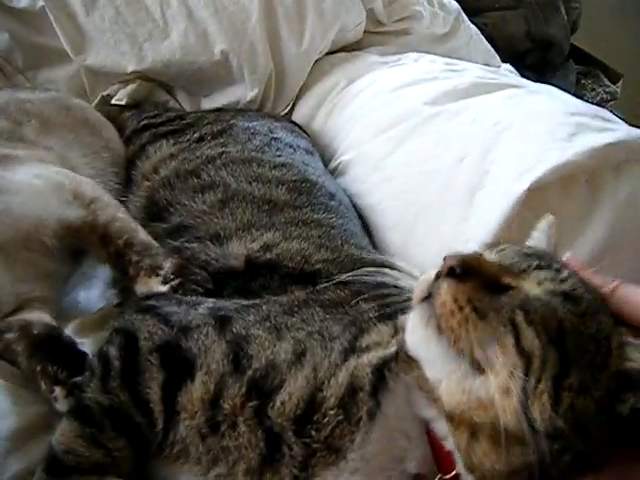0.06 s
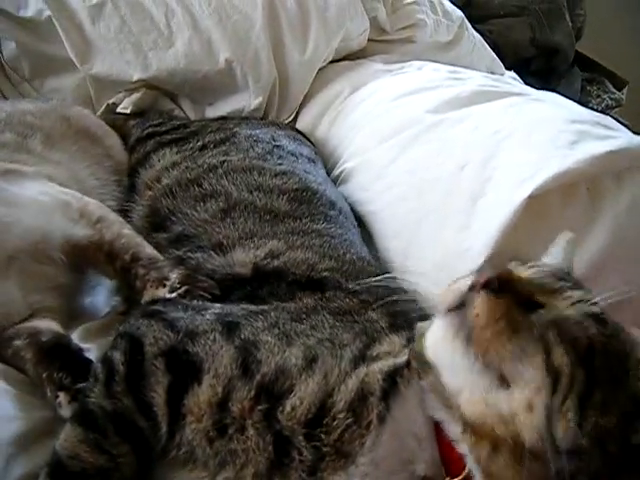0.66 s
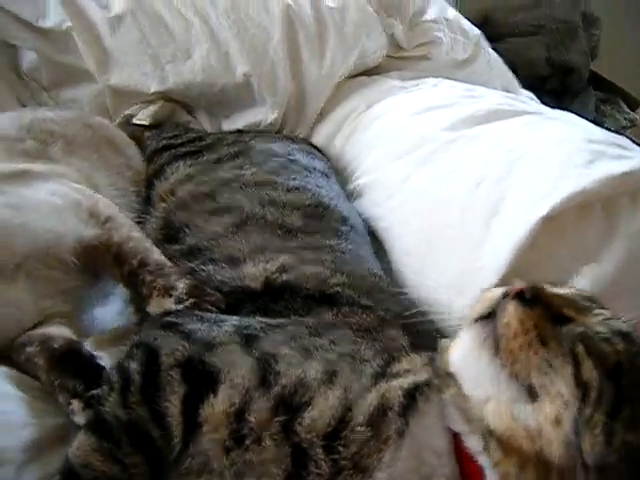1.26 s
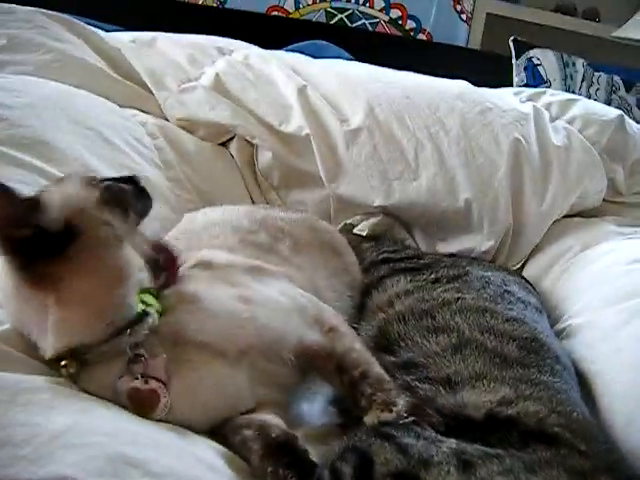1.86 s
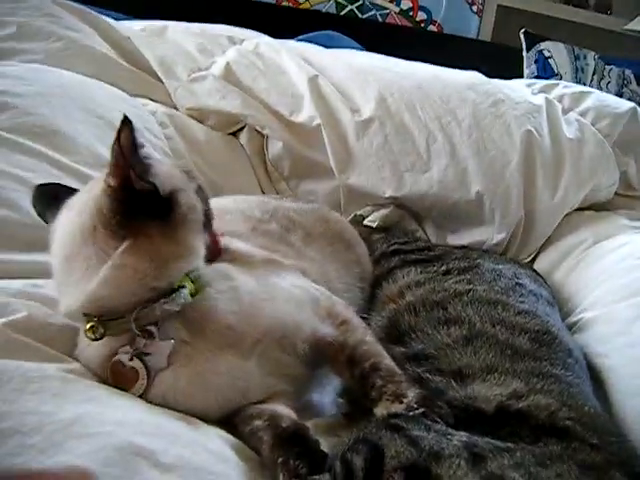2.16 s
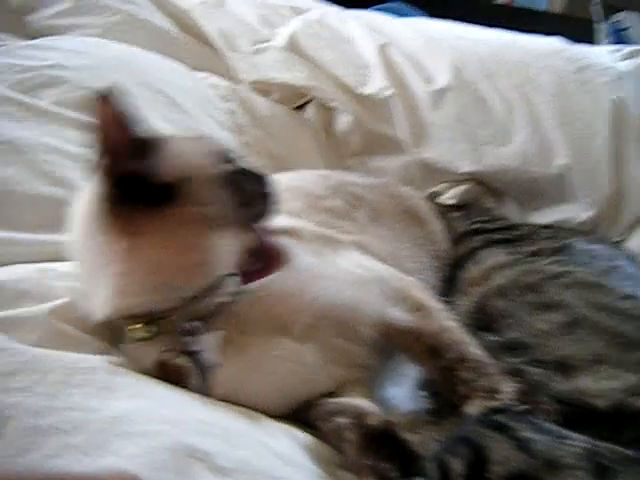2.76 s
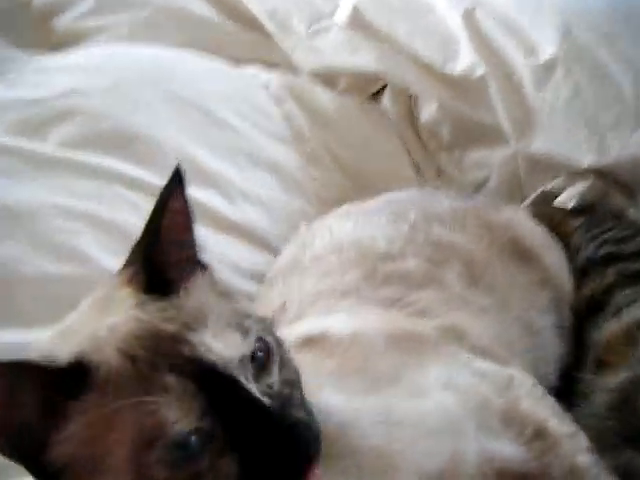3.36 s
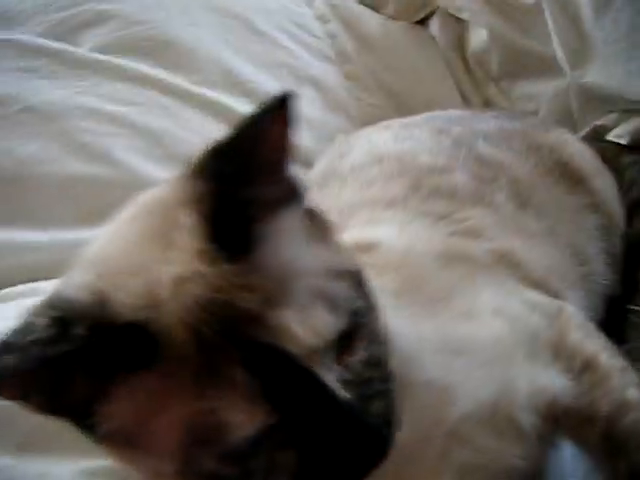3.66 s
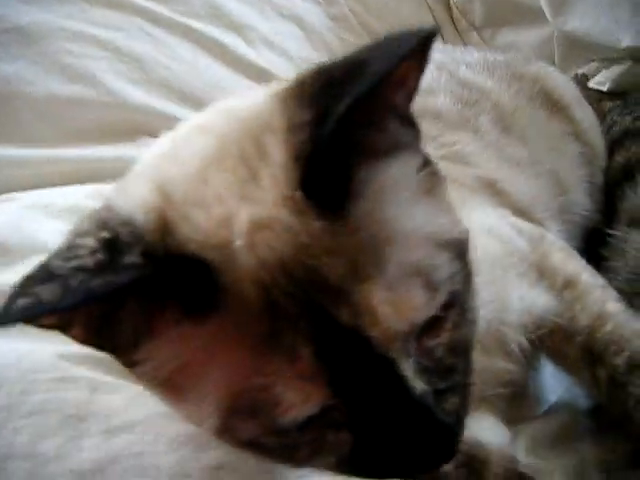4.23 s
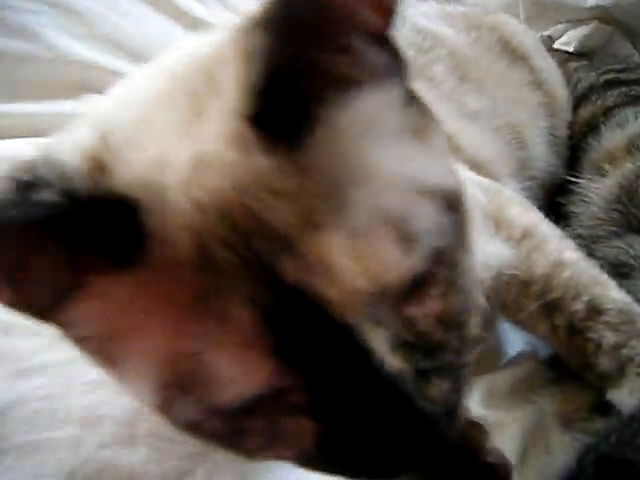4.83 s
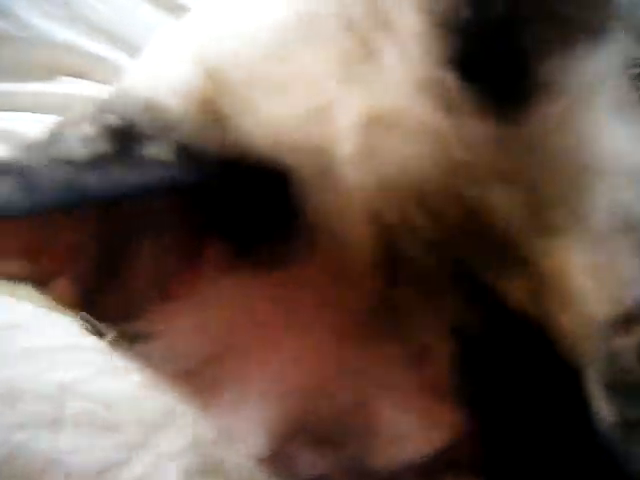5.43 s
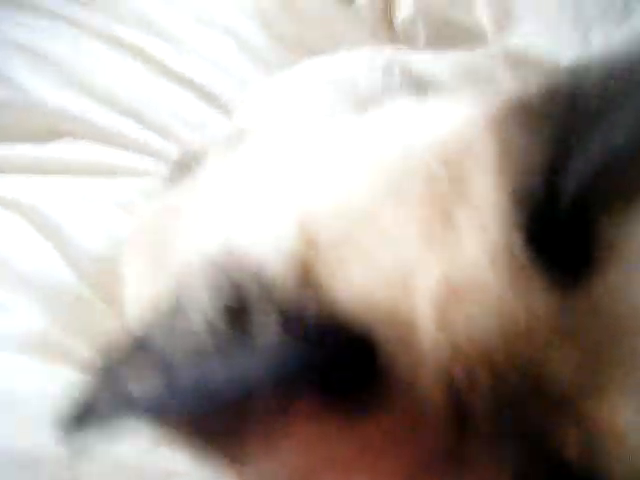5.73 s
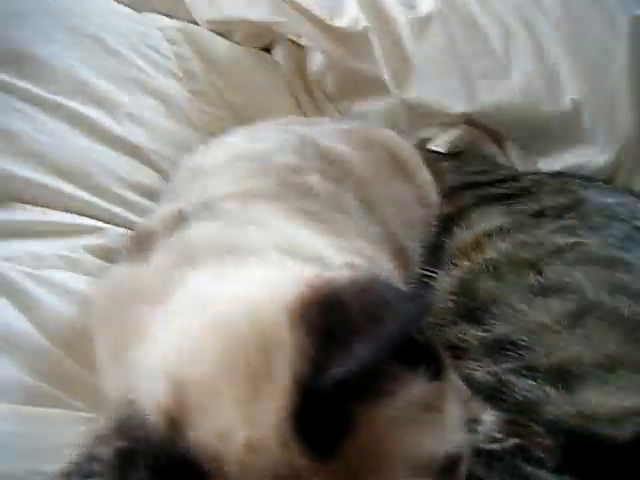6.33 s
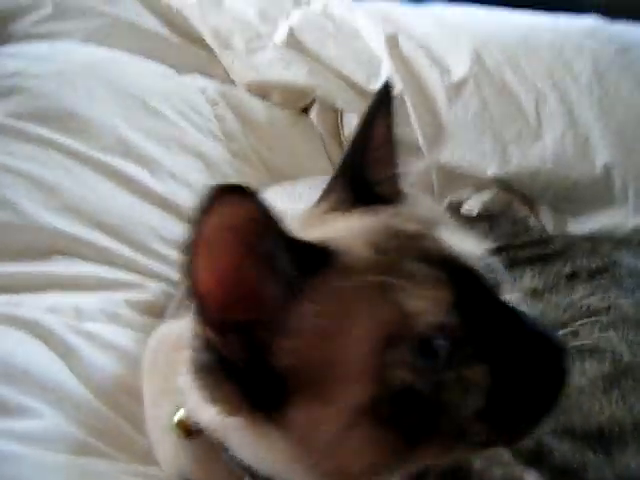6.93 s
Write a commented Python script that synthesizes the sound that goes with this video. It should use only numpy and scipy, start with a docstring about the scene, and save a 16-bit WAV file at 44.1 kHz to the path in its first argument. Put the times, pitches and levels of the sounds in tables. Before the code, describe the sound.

A kitten moves on softly rustling sheets, its collar tags and tiny bell chinking, with a few handling knocks and low room rumble.

```python
"""A quiet room: a kitten shifts about on bedding, close to the microphone of a hand-held camera.
Its collar tags tick and slide on each other, and a tiny bell, muffled by fur, chinks in between.
Sheets and fur rustle. There are light clicks and taps, camera bumps and a finger grazing the microphone.
Behind it all lie low room rumble, hiss and a faint whine; the sound is mono, on two channels."""
import sys
import numpy as np
from scipy import signal
from scipy.fft import rfft, irfft, next_fast_len
from scipy.io import wavfile
from scipy.ndimage import uniform_filter1d

SR = 44100
rng = np.random.default_rng(int(sys.argv[2]) if len(sys.argv) > 2 else 0)


def bounce(signal):
    """Save signal as a 16-bit WAV file at the path given by the first command-line argument."""
    frames = np.transpose(np.atleast_2d(signal))
    limited = np.clip(frames, -1, 1)
    pcm = np.round(limited * 32767).astype(np.int16)
    wavfile.write(sys.argv[1], SR, pcm)


N = 308259
T = np.arange(N) / SR
AGE = T[:SR // 5]  # time since a blow, s

# spectrum of tag scraping on tag: f/Hz, level/dB
SCRAPE_SPECTRUM = [(2000, -18), (3800, -9.5), (4700, -12.5), (5700, -6.5), (6380, -2), (6900, -6),
                   (7800, -29), (9200, -8), (10500, 0.5), (11100, -11), (11800, 0.5), (13000, 0),
                   (15800, -5)]
# bright spectrum of brushed fur and of the bell pellet's tick: f/Hz, level/dB
BRUSH_SPECTRUM = [(3000, -18), (5000, -9), (6400, 1.5), (7800, -11), (9500, -0.5), (12000, 2.5),
                  (15800, -2.5)]
# midrange spectrum of swishing cloth and of the crack in a click: f/Hz, level/dB
SWISH_SPECTRUM = [(1600, -3), (2400, -1.5), (2750, -3), (3300, 1), (4200, -5.5), (6400, -11.5), (7800, -25)]


def tag_ticks(focus_db=12, focus_hz=600, attack_s=0.00048):
    """Each contact chatters for a moment and rings the tags; where it lands picks the strongest mode."""
    # modes of the tags: f/Hz, t60/s, level/dB
    tag_modes = [(3660, 0.0046, -0.5), (5700, 0.01, 1), (6300, 0.025, -2), (6920, 0.0091, -15),
                 (8560, 0.08, -14.5), (9600, .01, -19), (10740, .06, -8.5), (11660, 0.032, -6.5),
                 (11970, .05, -5.5), (14300, 0.017, 1), (13700, 0.011, -16), (15530, 0.014, -6)]
    lowpass = signal.butter(8, 7400, fs=SR, output="sos")
    highpass = signal.butter(8, 8300, "high", fs=SR, output="sos")
    attack = 1 - np.exp(-AGE / attack_s)
    damping = fade(0.0093) + undb(-20.5)  # the neighbouring tag soon stops the ring; a little lingers
    out = np.zeros(N)
    for s, db, main_hz, low_db in tag_contacts():
        modes = [(hz, t60, mode_db + focus_db * np.exp(-((hz - main_hz) / focus_hz) ** 2))
                 for hz, t60, mode_db in tag_modes]
        chatter = burst(SCRAPE_SPECTRUM, t60=0.014)
        hit = (peak(ring(modes) * damping, 0) + peak(chatter, -3)) * attack
        add(out, s, peak(signal.sosfilt(highpass, hit), db - 1.5))
        add(out, s, peak(signal.sosfilt(lowpass, hit), db + low_db - 1))
    return out


def tag_contacts(rebound_s=0.007, rebound_db=-12.5, touch_hz=12100, touch_low_db=-17):
    """The tags bounce once after each blow, and touch lightly at random as the collar sways."""
    # tag strikes tag: t/s, treble level/dB, favoured f/Hz, low modes re treble/dB
    blows = [(1.4723, -23, 13900, -17), (1.4793, -20.5, 12000, -14.5), (1.495, -20, 11800, -27),
             (1.5303, -25, 11900, -22), (1.5344, -15, 11900, -19), (2.106, -28.5, 10300, -9),
             (2.1134, -26, 10400, -9), (2.4591, -25, 10500, -4.5), (2.596, -20.5, 11900, -10.5),
             (2.617, -25, 15000, -10.5), (2.708, -35, 13300, -11), (2.752, -27, 11900, -9),
             (2.765, -20.5, 12800, -3), (2.81, -25, 10500, -2.5), (2.891, -25.5, 8700, -5),
             (2.919, -37, 8620, -6), (3.2321, -38, 10900, -16), (3.3203, -19.5, 12900, -9.5),
             (3.3343, -22, 11600, -25), (3.519, -22.5, 10700, -22), (3.5666, -26, 13800, -11),
             (3.5767, -32, 13700, -13), (3.641, -31, 10700, -19), (3.6515, -31, 11000, -18),
             (4.104, -32, 10400, -10), (4.2222, -43, 12700, 0), (4.958, -37, 12000, -16),
             (5.1567, -38, 12000, -10), (5.1886, -41, 11900, -6)]
    # the collar sways: start/s, end/s, rate/(ticks per s)
    sways = [(1.48, 1.53, 70), (2.567, 2.83, 18), (3.102, 3.3, 14), (3.621, 3.645, 80), (6.672, 6.88, 8.8)]
    contacts = list(blows)
    for s, db, hz, low_db in blows:
        delay = rebound_s * np.exp(.2 * rng.standard_normal())
        contacts.append((s + delay, db + rebound_db, hz, low_db))
    for start, end, rate in sways:
        sway_db = -47 + 4 * np.log2(rate / 10)  # busier is louder
        for slot in np.arange(start, end - .5 / rate, 1 / rate):
            s = slot + rng.random() / rate
            contacts.append((s, rng.normal(sway_db, 1.5), rng.normal(touch_hz, 600), touch_low_db))
    return contacts


def tag_slides(sing_db=-6, squeal_db=21, big_tag_below_hz=10000):
    """Metal edges scrape along each other, swelling and letting go, and one mode sings out."""
    # tag slides on tag: start/s, length/s, level/dB, singing f/Hz
    slides = [(0.239, .052, -48, 11770), (1.027, .033, -54, 11200), (1.455, 0.095, -35.5, 11900),
              (1.538, 0.055, -45, 10480), (1.667, 0.06, -49, 11770), (1.9, 0.12, -45.5, 10480),
              (2.03, 0.072, -41, 10480), (2.103, 0.025, -35, 10480), (2.129, 0.054, -43.5, 10480),
              (2.303, 0.13, -49, 11770), (2.585, .036, -41, 11770), (2.752, 0.047, -44, 12950),
              (2.873, .03, -53, 14850), (3.32, 0.07, -50.5, 14850), (4.094, 0.0077, -47, 12950),
              (6.891, 0.067, -44, 13950)]
    scrape = friction(SCRAPE_SPECTRUM, grain_db=3, grain_hz=1000)
    rasp = undb(-15) * band(3840, 450)
    squeal_swell = swell(1.56, 0.056, 0.056)  # one scrape briefly squeals louder
    sing = undb(sing_db + squeal_db * squeal_swell)
    out = np.zeros(N)
    for s, length, db, hz in slides:
        progress = np.clip((T - s) / length, 0, 1)
        pressure = np.sin(np.pi * progress).clip(0) ** 0.42
        metal = scrape + sing * band(hz, 380) + rasp * (hz < big_tag_below_hz)
        out += undb(db + .5) * pressure * metal
    return out / np.hypot(1, sing)  # singing changes the tone, not the overall level


def bell(attack_s=0.001, detune=0.0045, tick_db=-22, roll_db=-21):
    """The pellet ticks on the shell and rolls on a little; fur stops most of the ring at once."""
    # lower and upper modes of the shell: f/Hz, t60/s, level/dB
    low_modes = [(5530, 0.017, -4), (5450, 0.14, -24), (5790, 0.024, -12)]
    high_modes = [(12700, 0.058, -2), (13220, .04, 0)]
    attack = 1 - np.exp(-(AGE / attack_s) ** 2)
    rolling = band(5550, 500)
    out = np.zeros(N)
    for s, db, upper_db in pellet_strikes():
        load = rng.normal(1, detune)  # pellet and fur load the shell differently each time
        low = ring([(hz * load, t60, mode_db) for hz, t60, mode_db in low_modes])
        shell = peak(low * attack, -1.3) + peak(ring(high_modes) * attack, upper_db - 2)
        tick = peak(burst(BRUSH_SPECTRUM, t60=.008), tick_db)
        roll = undb(roll_db) * rolling[int(s * SR):][:len(AGE)] * attack * fade(0.09)
        add(out, s, undb(db) * (shell + tick + roll))
    return out


def pellet_strikes(settle_s=3.6, count=10, gap_s=0.061, jitter_s=0.0077, upper_db=-15):
    """The pellet's clear strikes, and an uneven run of fading ones as it rocks to rest."""
    # pellet strikes shell: t/s, level/dB, upper modes relative/dB
    strikes = [(1.0021, -36, -12), (1.1636, -28.5, -12), (1.1737, -34, -4), (1.1844, -34, -20),
               (2.2009, -47, -21), (2.2204, -45, -20), (2.2777, -45, -28), (2.295, -36, -21),
               (2.6055, -28, -20), (2.616, -25.5, -7), (2.7166, -25.5, -13), (2.7295, -24, -10),
               (2.9015, -32.5, -5), (2.9382, -35.5, -24), (3.179, -34.5, -23), (3.4291, -48, -16),
               (3.4765, -47, -11), (3.696, -31.5, -5), (3.8043, -37.5, -18), (3.8322, -41.5, -4)]
    gaps = rng.normal(gap_s, jitter_s, count)
    times = settle_s + np.cumsum(gaps) - gaps[0]
    settling = [(s, -42 - 3.5 * np.log2(k + 1), upper_db) for k, s in enumerate(times)]
    return list(strikes) + settling


def rustle():
    """Cloth and fur rub close by, with a dull rush, a swish of the weave and a fine hiss on top."""
    # the kitten shifts, and early on a hand strokes fur: fastest at t/s, rise/s, fall/s, rub level/dB, swish re
    # rub/dB, brush re rub/dB
    moves = [(.5, 1, 0.91, -64.5, -8, 4), (2.8, 0.31, .18, -48.5, -3.5, -2),
             (3.2, .2, 0.11, -46, -0.5, -4.5), (3.62, 0.15, 0.097, -50, -7.5, -2.5),
             (4.1, 0.34, 0.13, -57, -13, -12), (5.14, 0.039, .06, -52, -11, -17),
             (5.4, 0.15, 0.46, -54.5, -4, 2), (5.81, 0.1, 0.17, -49.5, -4.5, -1),
             (6.95, 0.46, .2, -57, -5.5, 2)]
    # spectrum of rubbed sheets: f/Hz, level/dB
    sheet_spectrum = [(200, 5.5), (450, 5.5), (1100, 2.5), (1900, -4), (2600, -8), (4500, -37)]
    power = sum(np.outer(undb([db, db + swish_db, db + brush_db]) ** 2, swell(s, rise, fall) ** 2)
                for s, rise, fall, db, swish_db, brush_db in moves)
    rub, swish, brush = np.sqrt(power)
    rush = undb(-.5) * rub * friction(sheet_spectrum, grain_db=2.5, grain_hz=200)
    weave = undb(-1) * swish * friction(SWISH_SPECTRUM, grain_db=1.5, grain_hz=300)
    hairs = undb(-2) * brush * friction(BRUSH_SPECTRUM, grain_db=2.5, grain_hz=390)
    return rush + weave + hairs


def clicks_and_bumps(light_hz=4200, firm_hz=9000):
    """Clicks and taps, brighter when firmer; dull bumps reach the microphone through the camera body."""
    # light clicks and taps, one of them the knock of a tag: t/s, level/dB
    clicks = [(0.658, -47), (0.696, -42), (1.1855, -43), (1.751, -42), (4.104, -39), (5.2151, -17.5),
              (5.9047, -29)]
    # modes that ring in each click: f/Hz, t60/s, level/dB
    click_modes = [(857, 0.054, -8), (1167, 0.058, -10), (1445, 0.021, 1.5), (1863, 0.018, 0),
                   (2550, 0.018, 0), (3390, 0.011, 1), (4080, 0.0068, 2.5), (5280, 0.0079, 3),
                   (6400, 0.005, -10), (9700, 0.0034, -7)]
    # soft bumps on the camera: t/s, level/dB, f/Hz, t60/s
    bumps = [(1.5765, -16.5, 280, .015), (1.5842, -11, 115, .028), (2.724, -25, 70, .06)]
    out = np.zeros(N)
    for s, db in clicks:
        crack = burst(SWISH_SPECTRUM, t60=0.018)
        cutoff_hz = np.interp(db, (-28, -18), (light_hz, firm_hz))
        lowpass = signal.butter(2, cutoff_hz, fs=SR, output="sos")
        click = signal.sosfilt(lowpass, peak(ring(click_modes), 0) + peak(crack, -7))
        add(out, s, peak(click, db))
    for s, db, hz, t60 in bumps:
        add(out, s, undb(db) * fade(t60) * np.sin(2 * np.pi * hz * AGE))
    return out


def finger_scuff(snap_s=1.5765):
    """A finger grazes the microphone, catches with a snap that rings the housing, and lifts off."""
    # spectrum of the rubbing finger: f/Hz, level/dB
    scuff_spectrum = [(200, -2), (520, -6), (950, -10.5), (1500, -3.5), (2750, -7), (4200, -4.5),
                      (6500, -3), (7850, -25), (9500, -6.5), (13500, -5), (15800, -15)]
    # modes of the microphone housing: f/Hz, t60/s, level/dB
    housing_modes = [(680, 0.014, -4.5), (1205, 0.033, -3), (1640, 0.022, 0), (2320, 0.019, -1.5),
                     (3270, 0.019, 0.5), (6500, 0.017, 0)]
    moments = snap_s + np.array([-.008, -.003, -.0006, 0, .003, .007, .009])
    force_db = np.interp(T, moments, [-50, -13, -13, 0, 0, -12, -50], left=-200, right=-200)
    out = undb(force_db) * level(colour(rng.standard_normal(N), scuff_spectrum), -16)
    add(out, snap_s, peak(ring(housing_modes), -14))
    return out


def room_tone(whine_hz=15735):
    """Low rumble with a few wavering drones, under even hiss and a thin electronic whine."""
    # spectra of the room's rumble and of the hiss: f/Hz, level/dB
    rumble_spectrum = [(12, -44), (20, -16), (55, -5), (92, -4), (148, -1.5), (193, -4.5), (223, -3.5),
                       (351, -16), (490, -19.5), (552, -20.5), (607, -22), (668, -21.5), (1430, -27.5),
                       (1730, -28), (2200, -29.5), (6000, -36), (7800, -66), (13200, -120)]
    hiss_spectrum = [(5000, -9.5), (6400, -0.5), (7200, -3), (7900, -15.5), (8700, -1.5), (10000, 2.5),
                     (12000, 4), (15700, -0.5)]
    # drones in the room: f/Hz, width/Hz, level/dB
    drones = [(121.5, 11, -50), (149.8, 20, -49), (227.6, 28, -50), (320, 30, -60), (1394, 10, -70.5)]
    rumble = level(colour(rng.standard_normal(N), rumble_spectrum), -42)
    hiss = level(colour(rng.standard_normal(N), hiss_spectrum), -60)
    whine = level(np.sin(2 * np.pi * whine_hz * T), -66.5)
    return rumble + hiss + whine + sum(undb(db) * band(hz, width) for hz, width, db in drones)


def undb(db):
    """Decibels to gain."""
    return 10 ** (np.asarray(db) / 20)


def level(x, db):
    """Set the rms level."""
    return x * undb(db) / np.sqrt(np.mean(x ** 2))


def peak(x, db):
    """Set the level of the loudest millisecond."""
    power = uniform_filter1d(x ** 2, SR // 1000, mode="constant")
    return x * undb(db) / np.sqrt(power.max())


def colour(x, spectrum):
    """Shape a sound by (f/Hz, level/dB) points, rolling off beyond both ends."""
    hz, db = np.transpose(spectrum)
    size = next_fast_len(len(x))
    f = np.maximum(np.arange(size // 2 + 1) * SR / size, 1)
    skirt = np.minimum(f / hz[0], 1) ** 2 * np.minimum(hz[-1] / f, 1) ** 10
    gain = undb(np.interp(np.log(f), np.log(hz), db))
    return irfft(rfft(x, size) * skirt * gain, size)[:len(x)]


def fade(t60):
    """Exponential decay, 60 dB in t60 seconds."""
    return np.exp(-np.log(1000) * AGE / t60)


def ring(modes):
    """Decaying modes; every blow finds them at a new phase."""
    return sum(undb(db) * fade(t60) * np.sin(2 * np.pi * (hz * AGE + rng.random()))
               for hz, t60, db in modes)


def burst(spectrum, t60):
    """Coloured noise that dies away after a contact."""
    return colour(rng.standard_normal(len(AGE)), spectrum) * fade(t60)


def add(track, s, sound):
    """Mix a sound in at s seconds."""
    start = int(s * SR)
    track[start:start + len(sound)] += sound[:N - start]


def walk(rate):
    """Smooth random wander, spread near 1."""
    hold = max(int(SR / rate), 1)
    steps = np.repeat(rng.standard_normal(N // hold + 1), hold)[:N]
    return 1.2 * uniform_filter1d(steps, hold)


def friction(spectrum, grain_db, grain_hz):
    """Countless tiny slips of uneven strength, coloured by what they shake; rms 1."""
    slips = rng.standard_normal(N) * undb(grain_db * walk(grain_hz))
    return level(colour(slips, spectrum), 0)


def band(hz, width_hz):
    """A tone that wavers in level and phase, rms 1."""
    phase = 2 * np.pi * hz * T
    return level(walk(width_hz) * np.sin(phase) + walk(width_hz) * np.cos(phase), 0)


def swell(s, rise, fall):
    """A smooth rise to 1 at s seconds and a smooth fall."""
    return np.exp(-((T - s) / np.where(T < s, rise, fall)) ** 2 / 2)


def scene():
    """One close microphone hears everything, alike in both channels."""
    mono = room_tone() + rustle() + tag_ticks() + tag_slides() + bell()
    mono += clicks_and_bumps() + finger_scuff()
    return np.array([mono, mono])


def record(dry, top_hz=15900):
    """The camera cuts the top treble steeply."""
    return signal.sosfilt(signal.ellip(10, .2, 70, top_hz, fs=SR, output="sos"), dry)


dry = scene()
out = record(dry)
bounce(out)
```